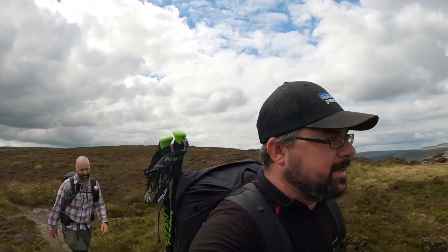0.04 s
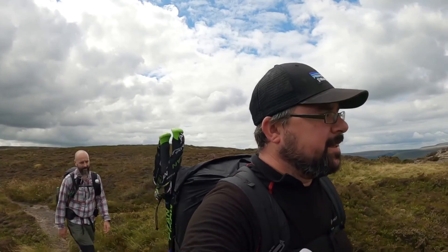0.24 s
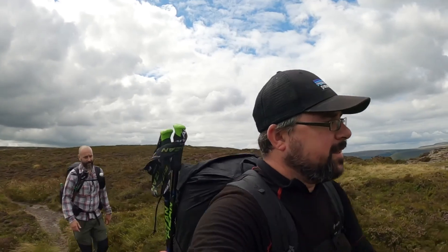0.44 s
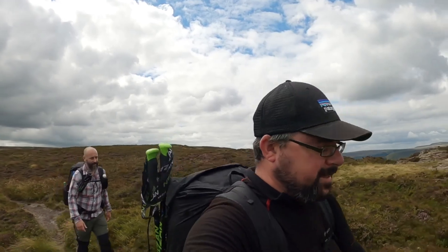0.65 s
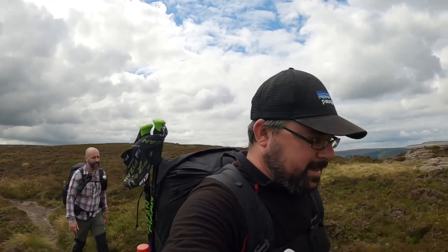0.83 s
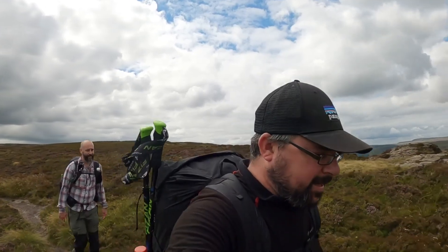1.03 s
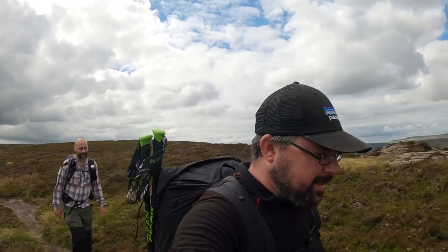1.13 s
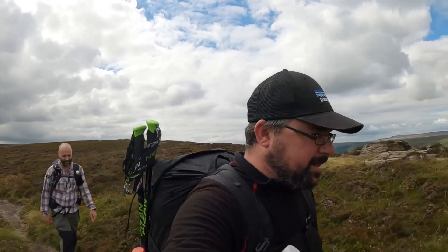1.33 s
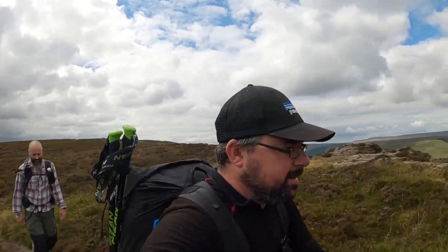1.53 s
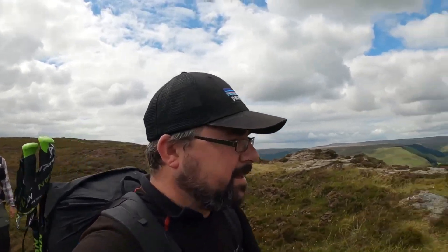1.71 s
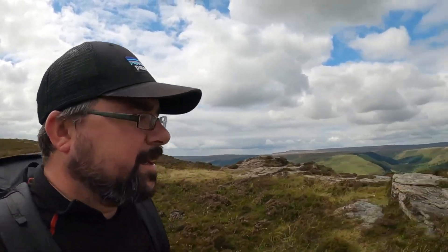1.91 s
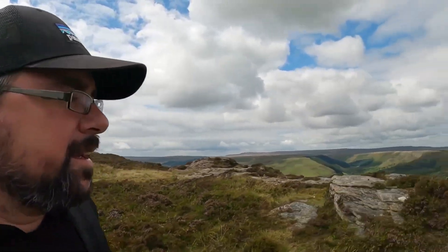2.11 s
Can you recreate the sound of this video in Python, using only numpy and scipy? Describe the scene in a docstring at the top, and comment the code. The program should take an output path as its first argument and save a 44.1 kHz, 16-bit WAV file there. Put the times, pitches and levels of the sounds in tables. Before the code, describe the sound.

Loud low wind rumble thuds and flaps unevenly against a microphone carried across an open moor

```python
"""Wind buffets a microphone carried across open moorland.
From the start: a low, lumpy rumble of large eddies that brightens as the flow quickens and small eddies
tear at the port, over a hiss of grass and clothing and a steady far hiss of wind, all filtered noise.
Soon come thuds (short sine bursts), slaps (single suck-push pulses), low puffs and grainy scuffs of
walking; then rough rasps at the port and a few light ticks of pack fittings (noise bursts)."""
import sys
import numpy as np
from scipy import signal
from scipy.fft import rfft, irfft
from scipy.io import wavfile
from scipy.ndimage import uniform_filter1d, minimum_filter1d

SR = 44100
rng = np.random.default_rng(int(sys.argv[2]) if len(sys.argv) > 2 else 0)


def log_audio(samples):
    """Write samples as a 16-bit WAV file to the path given in sys.argv[1]."""
    # one column per channel
    frames = np.atleast_2d(samples).T
    # limit to full scale, then quantise
    limited = np.clip(frames, -1, 1)
    pcm = np.round(limited * 32767).astype(np.int16)
    wavfile.write(sys.argv[1], SR, pcm)


N = 95256
TIME, FREQ = np.arange(N) / SR, np.fft.rfftfreq(N, 1 / SR)


def amp(db):
    """Decibels to gain."""
    return 10 ** (np.asarray(db) / 20)


def unit(x):
    """Scales to rms 1."""
    return x / np.sqrt(np.mean(x ** 2) + 1e-20)


def over_hz(points, hz):
    """Reads a table on a log-frequency axis."""
    point_hz, value = np.transpose(points)
    return np.interp(np.log(hz + 1), np.log(point_hz + 1), value)


def over_time(points):
    """Reads a curve at every sample."""
    return np.interp(TIME, *np.transpose(points))


def noise(shape_db):
    """Random-phase noise of rms 1 with the given spectrum."""
    phase = np.exp(2j * np.pi * rng.random(len(FREQ)))
    return unit(irfft(amp(shape_db) * phase, N))


def wobble(rate_hz):
    """Random drift of rms 1, rolled off above the rate."""
    return noise(-10 * np.log10(1 + (FREQ / rate_hz) ** 4))


def steadied(x):
    """Evens out the slow chance swells of a noise band."""
    power = unit(x) ** 2
    for _ in range(2):
        power = uniform_filter1d(power, size=1400)
    return x / np.sqrt(abs(power) + 1e-9)


def swell(at_s, half_s):
    """Bell-shaped envelope; half_s is its standard deviation."""
    return np.exp(-.5 * ((TIME - at_s) / half_s) ** 2)


# flow strength, low rumble, deepest pressure swings: [time_s, level_db]
FLOW_LEVEL = [(0.01, -40.5), (0.055, -41.5), (0.08, -32.5), (0.1, -49), (0.125, -35), (0.15, -33.5),
              (0.19, -38.5), (0.24, -37.5), (0.25, -44), (0.3, -42.5), (0.34, -33), (0.35, -33.5),
              (0.37, -31), (0.41, -28.5), (0.44, -30), (0.465, -33.5), (0.48, -27), (0.54, -30.5),
              (0.55, -29), (0.56, -38), (0.59, -26.5), (0.67, -33.5), (0.69, -29.5), (0.71, -38.5),
              (0.76, -29.5), (0.8, -27), (0.83, -28.5), (0.88, -26.5), (0.91, -52), (0.965, -49.5),
              (1.0, -27), (1.03, -23.5), (1.05, -33.5), (1.11, -30), (1.16, -34.5), (1.17, -28),
              (1.2, -36.5), (1.23, -25), (1.26, -32.5), (1.36, -27.5), (1.41, -43.5), (1.45, -36),
              (1.48, -47), (1.5, -32.5), (1.555, -26.5), (1.57, -42), (1.6, -37.5), (1.62, -44.5),
              (1.66, -30.5), (1.67, -32), (1.7, -23.5), (1.74, -35.5), (1.75, -29), (1.83, -64),
              (1.85, -31), (1.87, -46.5), (1.92, -29), (1.93, -32), (1.95, -31.5), (1.98, -55.5),
              (2.02, -31), (2.1, -43), (2.12, -35), (2.15, -33)]
RUMBLE_LEVEL = [(0.01, -25), (0.055, -21), (0.09, -31), (0.12, -20), (0.17, -24.5), (0.245, -25.5),
                (0.29, -28), (0.33, -23.5), (0.38, -25), (0.43, -18), (0.465, -28.5), (0.58, -23),
                (0.69, -20), (0.72, -28.5), (0.8, -16), (0.85, -32), (0.9, -28.5), (0.97, -17.5),
                (1.05, -20.5), (1.09, -29.5), (1.18, -23), (1.24, -21), (1.29, -23), (1.43, -21.5),
                (1.5, -20), (1.57, -25), (1.68, -15), (1.78, -24), (1.9, -27.5), (1.95, -17.5), (1.98, -25),
                (2.07, -23), (2.15, -20)]
DEEP_LEVEL = [(0.01, -15.5), (0.06, -27), (0.14, -27), (0.25, -17), (0.32, -27), (0.365, -17.5),
              (0.42, -22), (0.47, -16.5), (0.51, -25), (0.59, -15), (0.65, -26.5), (0.7, -17),
              (0.79, -17.5), (0.86, -28.5), (0.93, -22.5), (0.99, -25), (1.1, -20.5), (1.19, -20),
              (1.24, -18.5), (1.33, -18.5), (1.36, -18), (1.44, -20), (1.57, -29), (1.65, -21.5),
              (1.71, -18), (1.8, -24.5), (1.88, -27.5), (1.92, -22), (1.96, -23), (2.01, -23),
              (2.15, -19.5)]
USUAL_FLOW_DB, USUAL_RUMBLE_DB, USUAL_DEEP_DB = -30.5, -21, -19.5
# buffeting spectrum at usual flow: [freq_hz, density_db]
BUFFET_SPECTRUM = [(8, -4.5), (22, 0.5), (45, 0.5), (80, -3), (125, -5), (180, -7), (270, -9.5),
                   (420, -13.5), (650, -21.5), (1000, -30), (1500, -43), (2200, -53.5), (4000, -69),
                   (9000, -93.5)]
# how far each eddy size follows each level: [freq_hz, follow_db_per_db]
FOLLOW_FLOW = [(40, 0), (120, -0.2), (250, 0.25), (500, 0.82), (1000, 1.2235), (2000, 1.32), (4000, 1.33)]
FOLLOW_RUMBLE = [(60, 0.087), (125, 0.83), (250, 0.55), (500, 0.25)]
FOLLOW_DEEP = [(60, 0.83), (125, 0.046)]
BUFFET_DB, FLUTTER_RMS_DB, FLUTTER_HZ = -17.5, 2, 87.5


def buffeting():
    """Turbulent pressure by octave: large eddies swell on their own, small ones follow the fluttering flow."""
    flow_db = over_time(FLOW_LEVEL) - USUAL_FLOW_DB + FLUTTER_RMS_DB * wobble(FLUTTER_HZ)
    rumble_db = over_time(RUMBLE_LEVEL) - USUAL_RUMBLE_DB
    deep_db = over_time(DEEP_LEVEL) - USUAL_DEEP_DB
    pressure = rfft(noise(over_hz(BUFFET_SPECTRUM, FREQ)))
    centres_hz = 31.25 * 2. ** np.arange(9)
    out = np.zeros(N)
    for hz, own in zip(centres_hz, np.eye(len(centres_hz))):
        band = over_hz(np.c_[centres_hz, own], FREQ)  # 1 at its own centre, 0 at the others
        eddies = steadied(irfft(pressure * band, N))
        level_db = over_hz(FOLLOW_FLOW, hz) * flow_db
        level_db = level_db + over_hz(FOLLOW_RUMBLE, hz) * rumble_db
        level_db = level_db + over_hz(FOLLOW_DEEP, hz) * deep_db
        out += eddies * amp(level_db)
    return amp(BUFFET_DB) * out


# grass and clothing level: [time_s, level_db]
HISS_LEVEL = [(0, -53), (.1, -58.5), (.18, -58), (.25, -54), (.35, -59.5), (.48, -54.5), (.57, -56),
              (.66, -50), (.8, -52.5), (.96, -55.5), (1.02, -54.5), (1.11, -51.5), (1.3, -69.5),
              (1.49, -66.5), (1.6, -55), (1.8, -60.5), (1.87, -66.5), (1.92, -63), (2.16, -57)]
# its spectrum: [freq_hz, density_db]
HISS_SPECTRUM = [(300, -5), (1000, -0.5), (2000, 1), (3500, -1.5), (5000, -8), (7000, -20), (10000, -24.5),
                 (12000, -40)]
HISS_GRAIN_RMS_DB, HISS_GRAIN_HZ = 2, 200


def hiss():
    """Grass and clothing brush softly, with a fine grain."""
    level_db = over_time(HISS_LEVEL) + HISS_GRAIN_RMS_DB * wobble(HISS_GRAIN_HZ)
    return noise(over_hz(HISS_SPECTRUM, FREQ)) * amp(level_db)


# far wind spectrum: [freq_hz, density_db]
MOOR_SPECTRUM = [(300, 1.5), (1500, -7), (4500, -6), (6500, -8), (8000, -14.5), (11000, -21.5),
                 (12500, -33.5)]
MOOR_DB = -65.5


def moor():
    """Distant wind in the heather, smooth and steady."""
    return amp(MOOR_DB) * noise(over_hz(MOOR_SPECTRUM, FREQ))


# large eddies thudding on the microphone: [centre_s, level_db, pitch_hz, half_s]
THUDS = [(0.077, -12.5, 121, 0.0057), (0.124, -21, 348, 0.0085), (0.129, -25, 600, 0.0059),
         (0.163, -11.5, 111, 0.0085), (0.332, -16, 60, 0.017), (0.335, -25.5, 600, 0.0038),
         (0.371, -23.5, 540, 0.0048), (0.371, -15.5, 121, 0.011), (.439, -13.5, 55, 0.015),
         (0.521, -13, 111, 0.003), (0.556, -15, 78, 0.0098), (0.684, -15.5, 132, 0.0079),
         (0.689, -21, 387.7, .007), (0.775, -10.5, 111, 0.0043), (0.783, -18, 480, .004),
         (0.8, -21, 368, 0.003), (0.802, -16.5, 78, 0.017), (.814, -15.5, 658, .002),
         (0.866, -14.5, 111, 0.01), (0.939, -16, 215, 0.0034), (1.003, -12.5, 93, .013),
         (1.036, -23, 355, 0.006), (1.046, -13, 60, 0.013), (1.16, -15.5, 55, 0.018),
         (1.218, -16, 224, 0.0034), (1.233, -22.5, 412, .007), (1.342, -10, 281.4, 0.0027),
         (1.361, -16, 72, 0.015), (1.361, -16.5, 453.4, 0.0023), (1.388, -9, 205, 0.0017),
         (1.454, -13.5, 205, 0.0028), (1.534, -15, 121, 0.015), (1.657, -12.5, 172, 0.0073),
         (1.683, -6, 244, 0.0024), (1.697, -4, 244, 0.0016), (1.7, -16.5, 452, 0.0034),
         (1.717, -11.5, 347, 0.0018), (1.721, -9.5, 144, 0.0042), (1.75, -9, 244, 0.0014),
         (1.758, -20.5, 387, 0.0049), (1.762, -13.5, 244, 0.0039), (1.962, -15, 60, .009),
         (2.08, -23.5, 102, 0.014), (2.119, -21.5, 55, 0.019)]


def thuds():
    """A large eddy rocks the pressure in a short sine burst: a dull lump in the rumble."""
    out = np.zeros(N)
    for at_s, level_db, pitch_hz, half_s in THUDS:
        swing = np.sin(2 * np.pi * (pitch_hz * TIME + rng.random()))
        out += amp(level_db) * swell(at_s, half_s) * swing
    return out


# single eddies slapping the port: [centre_s, level_db, width_s]
SLAPS = [(0.127, -15, 0.0006), (0.476, -21, 0.00059), (0.485, -9.5, 0.00054), (.548, -11, 0.00059),
         (1.004, -20, 0.00016), (1.03, -18.5, 0.00046), (1.106, -22.5, 0.0002), (1.165, -15.5, 0.00051),
         (1.219, -22, 0.00032), (1.339, -14.5, 0.00043), (1.703, -20.5, 0.00039), (1.712, -26.5, 0.00017),
         (1.777, -19, 0.00037), (1.851, -13.5, 0.00066), (2.03, -16.5, 0.00034)]


def slaps():
    """A vortex crossing the port gives one quick suck and push."""
    out = np.zeros(N)
    for at_s, level_db, width_s in SLAPS:
        u = (TIME - at_s) / width_s
        out += amp(level_db) * 2 * u / (1 + u ** 2) * np.exp(-(u / 4) ** 2)
    return out


# soft low puffs: [centre_s, level_db, half_s]
PUFFS = [(0.132, -23, 0.0073), (0.24, -24.5, 0.0097), (0.33, -23, 0.013), (0.389, -25.5, 0.011),
         (0.502, -21, 0.011), (1.017, -21, .014), (1.306, -28, .008), (1.597, -22.5, 0.0087),
         (2.077, -23.5, 0.0066)]
# their spectrum: [freq_hz, density_db]
PUFF_SPECTRUM = [(60, -22), (150, 1), (280, 5), (450, -2.5), (700, -28.5), (1200, -41), (4000, -77)]


def puffs():
    """Mid-sized eddies roll past with a soft flap: one steadied noise under bell envelopes."""
    air = steadied(noise(over_hz(PUFF_SPECTRUM, FREQ)))
    return air * sum(amp(level_db) * swell(at_s, half_s) for at_s, level_db, half_s in PUFFS)


# scuffs of boots and pack: [centre_s, level_db, half_s, tilt_db_per_octave]
SCUFFS = [(0.209, -35.5, 0.0035, -6), (0.615, -45.5, 0.015, -4), (1.401, -47, .003, -9),
          (1.418, -55, 0.016, -7), (1.406, -56.5, 0.021, 12), (1.722, -47, 0.0026, -2),
          (1.79, -63, 0.032, 10)]
# their spectrum before tilt: [freq_hz, density_db]
SCUFF_SPECTRUM = [(400, -33), (1300, -5), (2250, -0.5), (2580, 10.5), (2850, 1), (3600, 5.5), (4300, -3),
                  (5500, -8.5), (8000, -21), (12000, -40)]
SCUFF_GRAIN_RMS_DB, SCUFF_GRAIN_HZ = 3, 400


def scuffs():
    """Short grainy rubs that swell and die away."""
    out, octaves = np.zeros(N), np.log2(FREQ + 1)
    for at_s, level_db, half_s, tilt_db in SCUFFS:
        rub = noise(over_hz(SCUFF_SPECTRUM, FREQ) + tilt_db * octaves)
        grain_db = SCUFF_GRAIN_RMS_DB * wobble(SCUFF_GRAIN_HZ)
        out += rub * amp(level_db + grain_db) * swell(at_s, half_s)
    return out


# rasps of air tearing at the port: [centre_s, level_db, half_s, cavity_ring_db]
TEARS = [(0.434, -43.5, 0.0069, 2), (0.478, -46, 0.0046, -2), (0.797, -36.5, .018, 0),
         (0.843, -38.5, 0.009, -2), (0.916, -43, 0.027, 5), (1.002, -33, .003, 4),
         (1.019, -33.5, 0.019, 1.5), (1.072, -39, 0.014, 3), (1.107, -37, 0.011, 0.5),
         (1.179, -38.5, 0.018, -2), (1.39, -41, 0.012, 1), (1.711, -32, 0.0047, 0),
         (1.727, -34.5, 0.0042, 14), (2.033, -43.5, 0.0028, -7)]
# their spectrum without the cavity: [freq_hz, density_db]
TEAR_SPECTRUM = [(300, -11.5), (900, 6.5), (1400, 2), (2200, -12), (4000, -20), (6000, -40.5), (10000, -62)]
TEAR_GRAIN_RMS_DB, TEAR_GRAIN_HZ = 3.5, 251
PORT_HZ, PORT_HALF_WIDTH_HZ = 2570, 300


def tears():
    """Brief rough rasps as fast air breaks up on the port; its cavity lifts or dips a band in each."""
    out = np.zeros(N)
    cavity = 1 / (1 + ((FREQ - PORT_HZ) / PORT_HALF_WIDTH_HZ) ** 2)
    for at_s, level_db, half_s, ring_db in TEARS:
        rasp = noise(over_hz(TEAR_SPECTRUM, FREQ) + ring_db * cavity)
        out += rasp * amp(level_db) * swell(at_s, half_s)
    return out * amp(TEAR_GRAIN_RMS_DB * wobble(TEAR_GRAIN_HZ))


# light ticks of pack fittings: [centre_s, level_db, ring_hz, width_hz, half_s]
TICKS = [(0.763, -44, 3200, 2200, 0.00054), (1.901, -58.5, 6900, 1300, 0.00065),
         (1.915, -53.5, 4720, 420, .0016)]


def ticks():
    """Pack fittings knock lightly: tiny noise clicks, each in its own band."""
    out = np.zeros(N)
    for at_s, level_db, ring_hz, width_hz, half_s in TICKS:
        click = noise(-20 * np.log10(1 + ((FREQ - ring_hz) / width_hz) ** 2))
        out += amp(level_db) * swell(at_s, half_s) * click
    return out


def scene():
    """Everything at one microphone."""
    wind = buffeting() + hiss() + moor()
    eddies = thuds() + slaps() + puffs() + tears()
    walking = scuffs() + ticks()
    return (wind + eddies + walking)[None]


LIMIT_DB, LIMIT_HOLD_S, EDGE_HZ = -6.5, .008, 11900


def record(dry):
    """A quick limiter holds down the hardest buffets; then a low-pass sets the band limit."""
    hold = max(int(LIMIT_HOLD_S * SR), 2)
    gain = np.minimum(1, amp(LIMIT_DB) / (abs(dry) + 1e-9))
    gain = minimum_filter1d(gain, hold)
    for _ in range(2):
        gain = uniform_filter1d(gain, hold // 2)
    low_pass = signal.firwin(255, EDGE_HZ, window=("kaiser", 9), fs=SR)
    return signal.oaconvolve(dry * gain, low_pass[None], "same")


dry = scene()
out = record(dry)
log_audio(out)
```